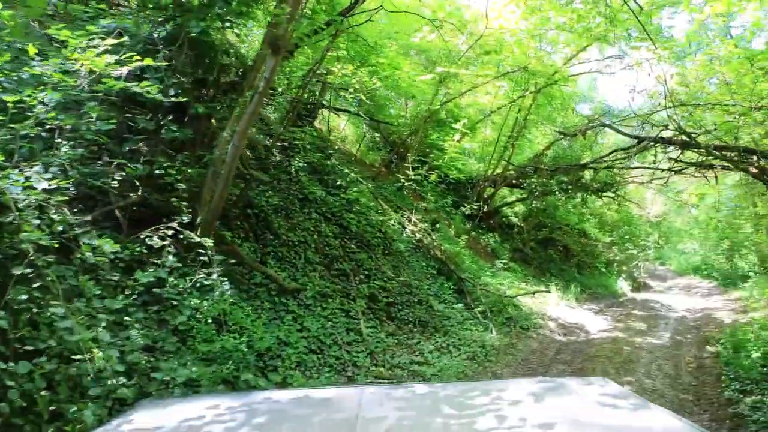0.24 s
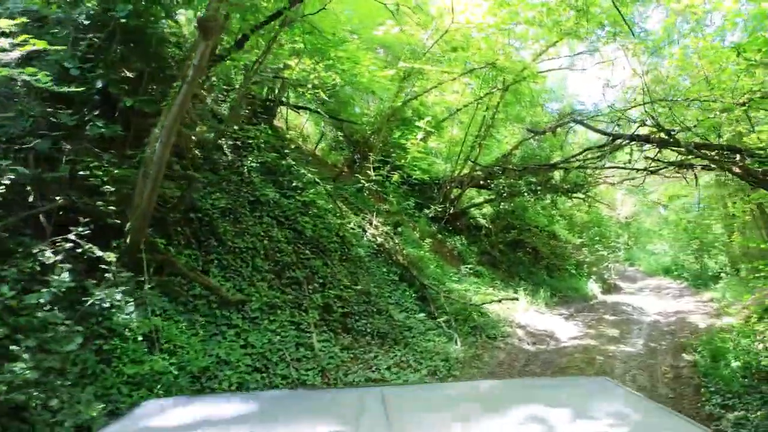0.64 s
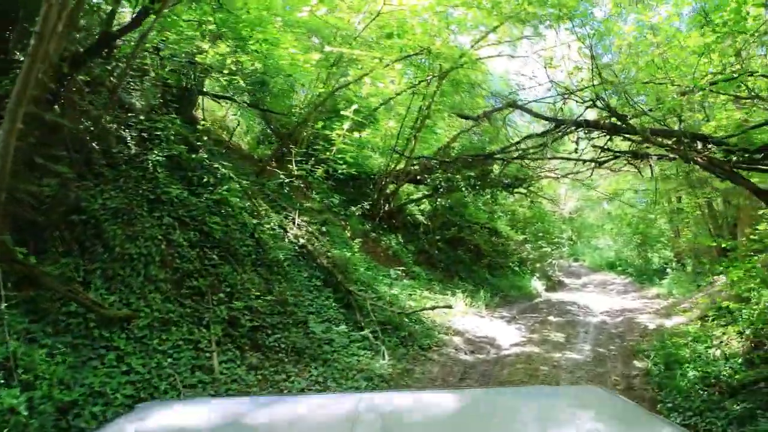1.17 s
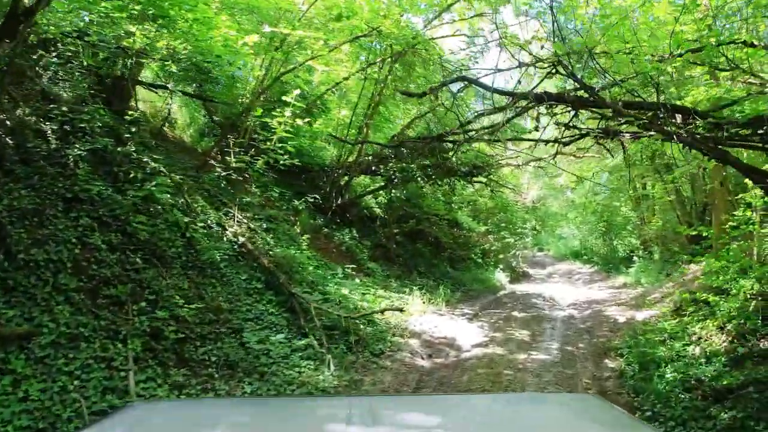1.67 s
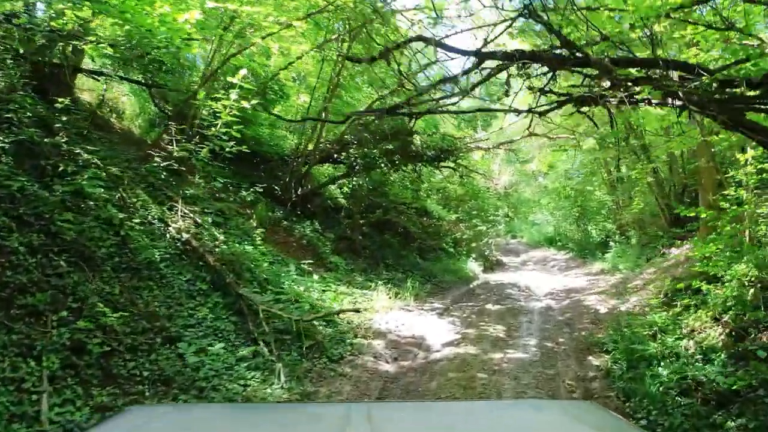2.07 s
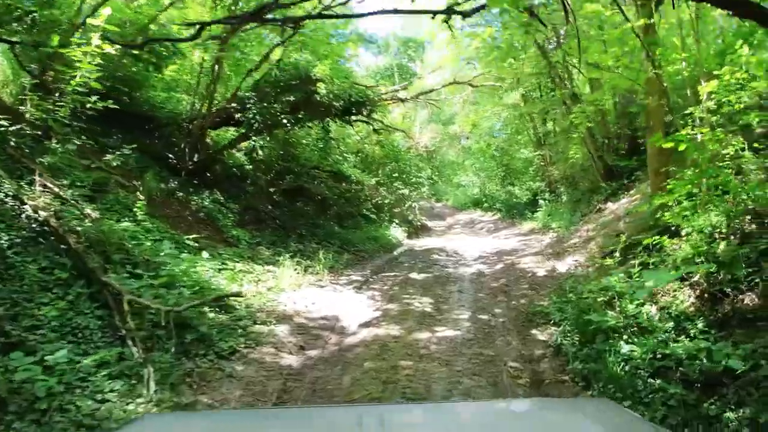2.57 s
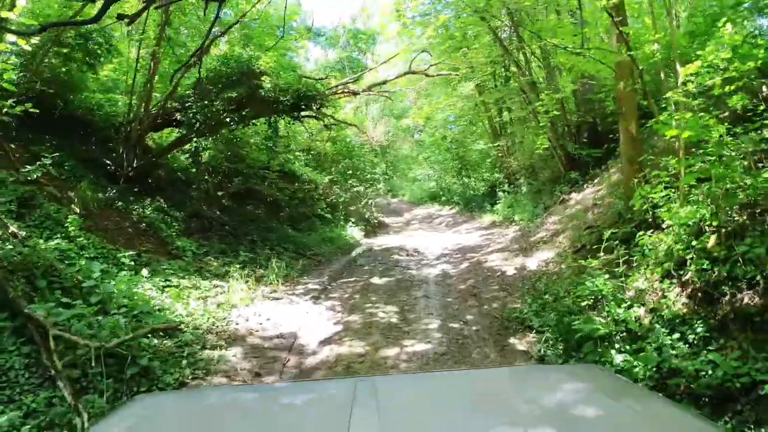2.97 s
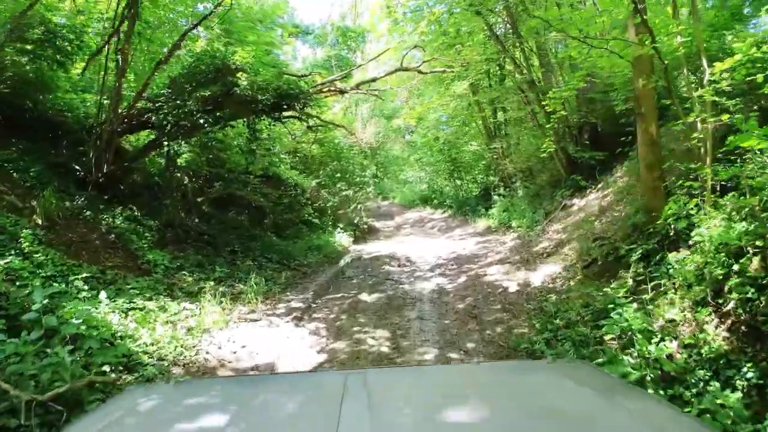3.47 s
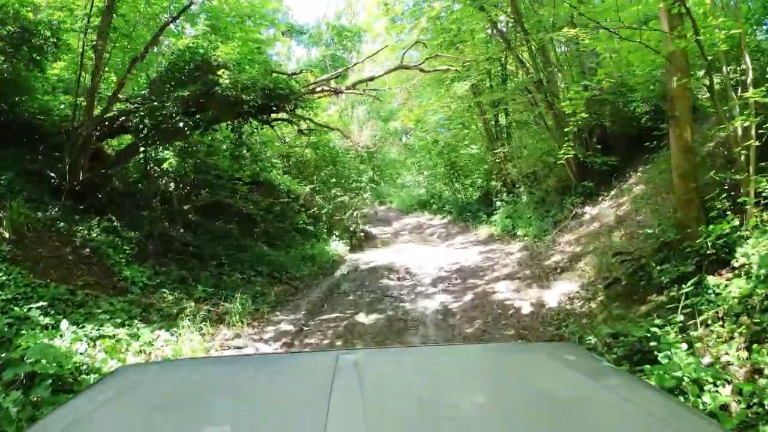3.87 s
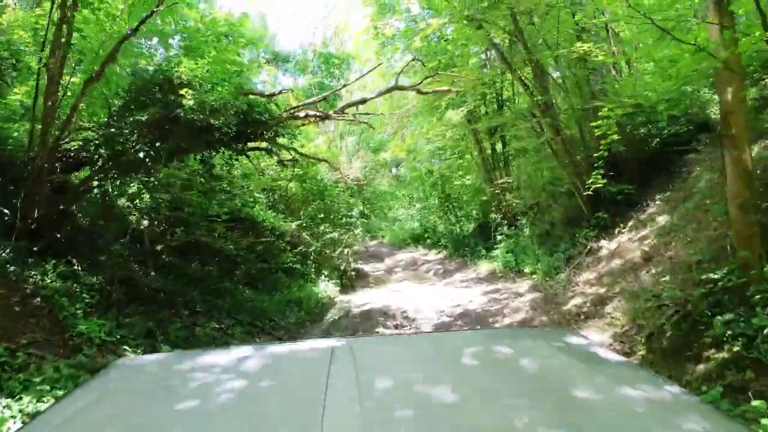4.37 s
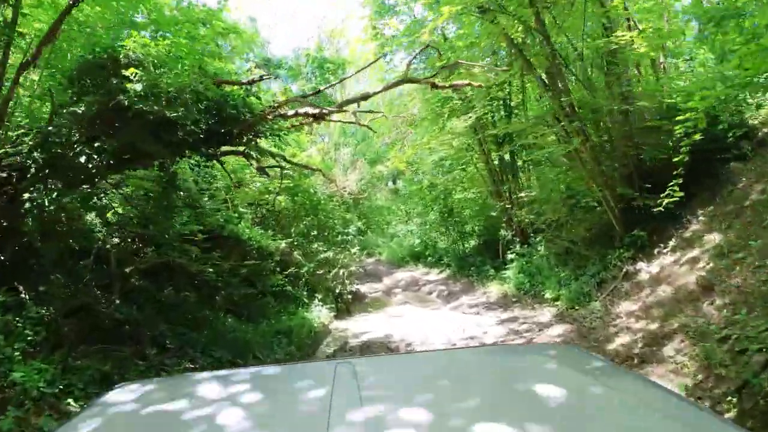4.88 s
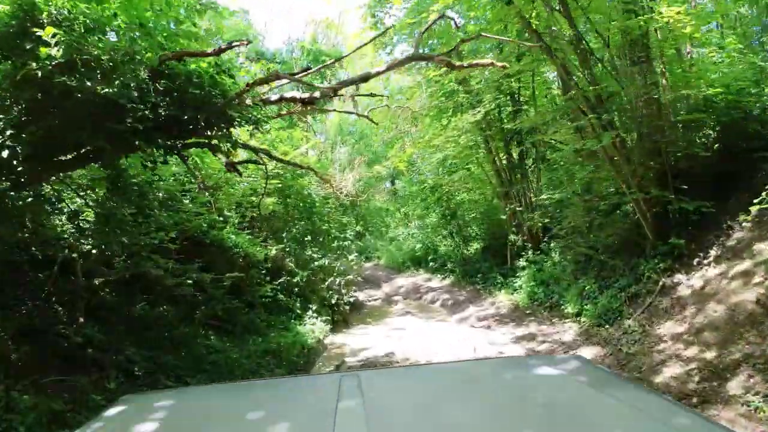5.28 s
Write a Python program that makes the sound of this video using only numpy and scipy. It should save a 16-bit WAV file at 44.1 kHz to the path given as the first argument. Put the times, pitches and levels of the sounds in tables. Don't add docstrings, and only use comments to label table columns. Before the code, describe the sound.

A rough multi-cylinder engine drones and surges inside an off-road vehicle on a rutted forest track, with body thumps, metal clacks and gritty tyre hiss.

```python
import sys
import numpy as np
from scipy import signal
from scipy.fft import rfft, irfft, next_fast_len
from scipy.io import wavfile
from scipy.ndimage import uniform_filter1d

SR = 44100
rng = np.random.default_rng(int(sys.argv[2]) if len(sys.argv) > 2 else 0)


def field_ratio(decibels):
    return 10 ** (np.asarray(decibels, dtype=float) / 20)


def digitize_waveform(pressure):
    field = np.atleast_2d(pressure).T
    bounded = np.clip(field, -1, 1)
    quanta = np.round(bounded * 32767).astype(np.int16)
    wavfile.write(sys.argv[1], SR, quanta)


N = 243873
SIZE = next_fast_len(N)
TIME, HZ = np.arange(N) / SR, np.arange(1, SIZE // 2 + 2) * SR / SIZE
LEFT_DB = -3.5
SIDES = np.array([[1], [-1]])

# (time [s], level over the mean [dB])
GROUND = [(0, 0), (.08, -3.5), (.3, -0.5), (.55, 1), (.98, -2), (1.45, -6.5), (1.6, -5.5), (2.09, 0),
          (2.4, 2), (2.65, 2), (3.05, 1), (3.9, -0.4), (4.3, 2), (4.7, 2), (5.04, 1), (5.22, 0),
          (5.53, -1.5)]


def unit(x):
    return x / np.sqrt(np.mean(x ** 2))


def curves(table):
    s, *columns = np.transpose(table)
    return [np.interp(TIME, s, c) for c in columns]


def on_log(table):
    hz, value = np.transpose(table)
    return np.interp(np.log(HZ), np.log(hz), value)


def walk(rate):
    hold = int(SR / rate)
    steps = np.repeat(rng.standard_normal(N // hold + 1), hold)
    return 1.48 * uniform_filter1d(uniform_filter1d(steps, hold), hold)[:N]


def pan(db):
    return field_ratio(SIDES * db / 2)


def bell(hz, centre_hz, width_hz):
    return 1 / (1 + (2 * (hz - centre_hz) / width_hz) ** 2)


def spells(table, release):
    power = 1e-7
    for s, length, db, rise in table:
        up = np.maximum(s - TIME, 0) / max(rise, .002)
        down = np.maximum(TIME - s - length, 0) / max(release * rise, .002)
        power = power + field_ratio(2 * db) * np.exp(-2 * up ** 2 - 2 * down)
    return np.sqrt(power)


def stereo_noise(db, grain=0.):
    # (frequency [Hz], correlation [0-1])
    likeness = [(30, 0.11), (70, 0.099), (130, 0.62), (290, 0.71), (520, 0.69), (800, 0.87), (1410, 0.9),
                (2200, 0.34), (3100, .02), (15000, .01)]
    # (frequency [Hz], left minus right [dB])
    balance = [(30, -5), (70, 0.5), (300, 1), (1000, 1.5), (2000, 2), (4000, -2), (6000, 4), (9000, 1.5),
               (11000, -5), (16000, 6.5)]
    lead_samples = 4
    alike = np.clip(on_log(likeness), 0, 1)
    sizes = field_ratio(grain * rng.exponential(size=SIZE))
    mid, side = rfft(rng.standard_normal((2, SIZE)) * sizes)
    ports = field_ratio(db + SIDES * on_log(balance) / 2) * np.exp(1j * np.pi * SIDES * lead_samples * HZ / SR)
    return ports * (np.sqrt(1 + alike) * mid + np.sqrt(1 - alike) * side * SIDES)


def engine():
    # (time [s], firing rate [Hz])
    revs = [(0, 132.3), (.64, 146.3), (.9, 143.7), (1.12, 105.2), (1.43, 90.1), (1.65, 108.1),
            (1.82, 129.7), (2.03, 139.7), (2.25, 133.1), (2.5, 102.5), (2.79, 97), (3.08, 143.3),
            (3.22, 150.8), (3.74, 146), (4.29, 166), (4.95, 161.9), (5.33, 156.3), (5.53, 136.5)]
    # (time [s], firing line away from the roof resonance [dB])
    throttle = [(.15, -18.5), (.6, -14), (.88, -15.5), (1.3, -38.5), (1.8, -10.5), (2.33, -12), (2.53, -42),
                (2.97, -9), (3.3, -27), (3.43, -17.5), (3.98, -10.5), (4.18, -9.5), (4.3, -13.5),
                (4.73, -12), (5.0, -16.5), (5.27, -15), (5.4, -9.5), (5.53, -20.5)]
    # (time [s], engine left minus right [dB])
    lean = [
        (0, -4.5),
        (.75, -6),
        (1.9, -4.5),
        (3.3, -2.5),
        (5.53, -2),
    ]
    # (centre [Hz], width [Hz])
    cabin_boom = (151, 24)
    # (centre [Hz], width [Hz], level [dB])
    floor_modes = [(150, 22, -18), (207, 15.7, -26.5)]
    # (centre [Hz], width [Hz])
    pickup_panels = [(206, 5.2), (300, 32), (385, 17), (581, 27)]
    weak_orders = [1.25, 2, 28 / 12, 3.5, 3.75, 4]
    weak_levels = [-13.5, -15.5, -21, -19, -27, -20]
    # (time [s], length [s], level [dB], rise [s])
    gear_spells = [
        (.25, .65, -44, .15),
        (3.2, .75, -43, .15),
        (4.8, .75, -46, .3),
    ]
    # (time [s], length [s], level [dB], rise [s])
    bracket_spells = [
        (.55, .35, -41.5, .1),
        (1.45, .08, -49, .1),
    ]

    hz = uniform_filter1d(curves(revs)[0], size=SR // 12)
    load_db = uniform_filter1d(curves(throttle)[0], size=SR // 30)
    turn = 2 * np.pi * np.cumsum(hz * (1 + 0.0017 * walk(20))) / SR

    def order(k, db, wobble_db, lead):
        ports = SIDES * lead * (1 + 0.84 * walk(1.99)) / 2
        level = np.sqrt(2) * field_ratio(db + wobble_db * walk(11))
        return level * np.sin(k * turn + ports + rng.uniform(0, 2 * np.pi))

    firing_db = load_db + 6 * bell(hz, 155, 10)
    firing = order(1, firing_db, 0.7, 0.15)

    shaft = np.cos(turn / 12 + 1.0) + .45 * np.cos(turn / 6 + 2.0)
    boom_hz, boom_width_hz = cabin_boom
    boom_filter = signal.iirpeak(boom_hz, boom_hz / boom_width_hz, SR)
    throb = signal.lfilter(*boom_filter, shaft * firing * field_ratio(-.62 * firing_db))

    half_db = -32 + .12 * (hz - 150) + .15 * load_db
    half_db = half_db + 8 * np.clip((TIME - 2.9) / .1, 0, 1)
    three_quarter_db = -28.5 + .27 * (hz - 150) + .15 * load_db
    three_quarter_db = three_quarter_db + 7 * bell(.75 * hz, 123.5, 6)
    floor_power = sum(field_ratio(2 * db) * bell(1.5 * hz, f, width) ** 2 for f, width, db in floor_modes)
    three_halves_db = 10 * np.log10(floor_power + field_ratio(-105))
    lumps = order(.5, half_db, 1.4, 0.77) + order(.75, three_quarter_db, 2.4, 1.0)
    lumps = lumps + order(1.5, three_halves_db, 1.5, 0.39)

    weak = 0
    for k, under_db in zip(weak_orders, weak_levels):
        pickup = sum(bell(k * hz, f, width) for f, width in pickup_panels) + .05
        weak = weak + pickup * order(k, under_db + 0.54 * firing_db - 9.0, 2.1, 0.24)

    buzz_turn = 2 * np.pi * np.cumsum(2520 * (1 + 0.003 * walk(30))) / SR
    buzz = spells(bracket_spells, 0.84) * field_ratio(2.4 * walk(40.8)) * np.sin(buzz_turn)
    whine = spells(gear_spells, 1) * order(8.5, 3 * walk(45), 1.5, .8)
    lines = firing + field_ratio(-16) * throb + lumps + weak + whine + buzz
    return lines * pan(curves(lean)[0] - LEFT_DB), turn


def roar(turn):
    # (frequency [Hz], density [dB per Hz])
    noise_colour = [(25, -7), (42, -16), (58, -9), (100, -2), (150, 2), (300, -3.5), (600, -11),
                    (1000, -15), (2000, -21), (3500, -26.5), (5500, -39.5), (8000, -49.5), (16000, -36)]
    # (centre [Hz], width [Hz], lift [dB])
    panel_peaks = [(215, 27, 1), (302.4, 56, 3), (380, 37, 0.5), (507, 54, 2.5), (571, 12, 8), (705, 31, 3),
                   (1570, 71, -2), (1810, 120, 0)]
    ground_db = curves(GROUND)[0]
    peaks_db = sum(db * bell(HZ, f, width) for f, width, db in panel_peaks)
    spectrum = stereo_noise(on_log(noise_colour) + peaks_db, grain=1.07)
    pulse = 1 + 0.055 * np.cos(turn) + 0.073 * np.cos(turn / 4)
    low, high, shake, scrub = 0, 0, walk(14), walk(20)
    for octave in np.arange(4.5, 14.5, .5):
        share = np.cos(np.pi * np.clip(np.log2(HZ) - octave, -.5, .5)) ** 2
        band = irfft(spectrum * share, SIZE)[:, :N] * field_ratio(0.33 * walk(9))
        upper = np.clip((octave - 9.2) / 1.18, 0, 1)
        treble_db = np.clip(octave - 10.8, 0, 1) * (0.23 * ground_db + 1.52 * scrub)
        low = low + (1 - upper) * band * field_ratio(0.92 * shake)
        high = high + upper * band * field_ratio(0.68 * shake + treble_db)
    rumble = unit(low) * field_ratio(-20.5 + 0.24 * ground_db)
    return rumble + unit(high) * pulse * field_ratio(-29 + ground_db)


def grit():
    # (frequency [Hz], density [dB per Hz])
    grit_colour = [(3000, -17), (5500, -19), (8000, -9), (10000, -12.5), (10800, -6), (11600, 0.5),
                   (13000, -0.5), (15700, 1.5)]
    # (time [s], length [s], level [dB], rise [s])
    brushes = [(0, 0.06, -33.5, 0.072), (.19, 0.024, -38, .01), (.31, .14, -29, .01),
               (.91, 0.021, -32.5, .01), (1.04, .04, -40, 0.018), (1.22, 0.089, -33.5, .01),
               (1.95, .1, -34.5, 0.037), (2.45, .09, -30.5, 0.073), (2.62, 0.36, -29, 0.039),
               (3.04, .04, -41, .01), (3.155, 0.0091, -33, .005), (3.55, .015, -34, .008),
               (3.875, .015, -36, .006), (4.33, .1, -33, 0.066), (4.55, 0.11, -34.5, 0.047),
               (4.78, .19, -33, 0.026)]
    # (time [s], peak [dB], left minus right [dB])
    stones = [(0.1945, -24, -3.0), (0.3086, -16, -8), (0.74, -14.5, -2.5), (0.9073, -30, -5.5),
              (0.9995, -22, -4.0), (1.1673, -22, 1.0), (1.2181, -23, 0.5), (1.8916, -22, -7),
              (2.2244, -28, -2), (2.4294, -29, -2.5), (2.5094, -17, -2.0), (2.5774, -27, -1.5),
              (2.6234, -25, -2.5), (2.7, -28, -2.5), (2.7711, -20, -5), (2.7886, -26, -0.5),
              (3.0495, -12.5, 3), (3.1457, -26, -2.0), (3.5548, -24, -3), (3.8786, -32, -4),
              (5.3197, -31, -1.5)]
    colour_db = on_log(grit_colour)
    hiss = unit(irfft(stereo_noise(colour_db, grain=1.6), SIZE)[:, :N])
    tyre_gain = field_ratio(-34.5 + 0.97 * curves(GROUND)[0])
    hiss = hiss * np.hypot(tyre_gain, spells(brushes, 2.5))
    hiss = hiss * field_ratio(.5 * walk(14) + .9 * walk(60))

    ticks, t = np.zeros((2, N + SR)), TIME[:SR // 5]
    tick_t60_s = 0.016
    for s, db, pan_db in stones:
        burst = rng.standard_normal((2, len(t))) * 1000. ** (-t / tick_t60_s)
        start = int(s * SR)
        ticks[:, start:start + len(t)] += field_ratio(db - 3.0) * pan(pan_db - LEFT_DB) * burst
    return hiss + irfft(rfft(ticks[:, :N], SIZE) * field_ratio(colour_db), SIZE)[:, :N]


def knock(modes, hz, spread, bounce_s, crack_db, wide):
    t = TIME[:SR // 4]
    f, db, t60 = (c[:, None] for c in np.transpose(modes))
    level_luck, tune_luck, *port_luck = rng.standard_normal((4, len(modes), 1))
    gain = field_ratio(db - spread * abs(np.log2(f / hz)) + 2.0 * level_luck)
    gain = gain * 1000. ** (-t / t60) * (1 - np.exp(-f * t)) ** 2
    phase = 2 * np.pi * f * (1 + 0.019 * tune_luck) * t + 3 * tune_luck
    rings = np.array([(gain * np.sin(phase + wide * luck)).sum(0) for luck in port_luck])

    band = signal.butter(3, [hz / 1.8, hz * 1.45], "band", fs=SR, output="sos")
    crack = unit(signal.sosfilt(band, rng.standard_normal((2, len(t)))))
    crack = crack * np.exp(-t / (3 * bounce_s)) * np.minimum(t / .001, 1)
    ring = rings / abs(rings).max() + field_ratio(crack_db) * crack

    blows = np.zeros(SR // 10)
    bounce_times = np.cumsum(rng.uniform(.4, 1.6, size=3)) * bounce_s
    blows[(bounce_times * SR).astype(int)] = .65 ** np.arange(1, 4)
    blows[0] = 1
    hit = signal.fftconvolve(ring, blows[None])[:, :len(t)]
    return hit / abs(hit.mean(0)).max()


def knocks():
    # (frequency [Hz], level [dB], t60 [s])
    body_modes = [(213, 0, .12), (228, -3, .1), (272, -4, .09), (330, -6, .07), (375, -4, .09),
                  (445, -7, .06), (510, -6, .07), (585, -8, .06), (680, -6, .06), (780, -9, .05),
                  (900, -10, .05)]
    # (frequency [Hz], level [dB], t60 [s])
    metal_modes = [(660, -4, .05), (945, -2, .045), (1110, -3, .04), (1360, -1, .045), (1570, 0, .045),
                   (1780, 0, .045), (2050, -3, .04), (2300, -6, .035), (2600, -7, .03), (3050, -9, .025),
                   (3900, -15, .02)]
    # (time [s], peak [dB], brightest [Hz], left minus right [dB])
    thuds = [(0.004, -8, 380, -1.5), (0.024, -8.5, 600, -5), (0.044, -10.5, 507, 1),
             (0.164, -21, 579, -1.0), (0.313, -5, 690, -9), (0.379, -7, 680, -8), (0.618, -19, 586, -2),
             (1.213, -19, 520, -6), (1.588, -19.5, 498, -9), (1.995, -7.5, 625, 0),
             (2.019, -9.5, 662.5, -4), (2.664, -21, 633, 2), (2.713, -11.5, 515, -1),
             (3.444, -26, 507, -1.0)]
    # (time [s], peak [dB], brightest [Hz], left minus right [dB])
    clacks = [(0.0044, -21, 923, -15), (0.3077, -17.5, 1490, -10), (0.3849, -15, 964, 1),
              (1.1418, -30, 1303, 4), (1.4701, -23, 1256, -1.0), (1.5826, -27, 1020, -1.5),
              (1.6328, -20, 997, -7), (1.6551, -19.5, 1570, -3.0), (1.9956, -5.5, 1350, -3.5),
              (2.0044, -19, 942, -2.0), (2.0905, -20, 1250, -1.5), (2.1994, -21, 1520, -5),
              (3.482, -19, 902, -1.5), (3.7287, -17.5, 924, -3), (4.2752, -24, 1058, 3),
              (4.6583, -29, 1030, 1)]
    # (time [s], peak [dB], brightest [Hz], left minus right [dB])
    bumps = [(0.323, -1.5, 196, 4), (0.349, -4.5, 191, -12), (0.361, -4, 207, -9), (0.384, -5.5, 207, 3.5),
             (0.401, -10, 223, -5), (1.04, -9, 210, 2), (1.084, -9, 201, 1.0), (1.912, -10.5, 215, 1),
             (3.048, -15, 207, -1.0), (4.226, -20, 191, -5), (4.649, -15, 207, 5), (5.192, -14, 191, -1)]
    # (time [s], peak [dB], brightest [Hz], left minus right [dB])
    pings = [(0.3729, -11.5, 1750, -4), (0.6684, -32, 2520, -3.0), (1.001, -19.5, 1870, -1),
             (1.0585, -18.5, 2110, -4.0), (1.3354, -22.5, 1970, -2.0), (1.8723, -8, 1650, -4),
             (2.161, -23, 1882, -2.0), (2.2794, -22.5, 1728, -3.0), (2.3976, -19, 1820, -1.5),
             (2.4942, -18, 1740, -5), (2.5538, -12.5, 1816, -5), (2.5644, -18, 1914, -11),
             (2.6194, -25, 1650, -2.0)]
    # events, modes, spread [dB per octave], bounce [s], crack [dB], port phase spread [radians]
    kinds = ((thuds, body_modes, 5., .005, -12., 1.1),
             (clacks, metal_modes, 3.5, .003, -3., .5),
             (bumps, body_modes, 14., .005, -14., .8),
             (pings, metal_modes, 9., .002, -5., .6))
    out = np.zeros((2, N + SR))
    for events, modes, *touch in kinds:
        for s, db, hz, pan_db in events:
            hit = knock(modes, hz, *touch)
            start = int(s * SR)
            out[:, start:start + SR // 4] += field_ratio(db - 1) * pan(pan_db - LEFT_DB) * hit
    return out[:, :N]


def scene():
    lines, turn = engine()
    return pan(LEFT_DB) * (lines + roar(turn) + grit() + knocks())


def band_limit(x):
    return signal.sosfilt(signal.butter(12, 16800, fs=SR, output="sos"), x)


def record(dry):
    thin = signal.sosfilt(signal.butter(3, 42, "high", fs=SR, output="sos"), dry)
    cut = signal.sosfilt(signal.ellip(12, .2, 90, 15720, fs=SR, output="sos"), thin)
    return band_limit(np.clip(cut, -1, 1))


dry = scene()
out = record(dry)
digitize_waveform(out)
```